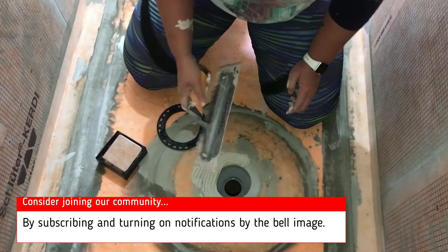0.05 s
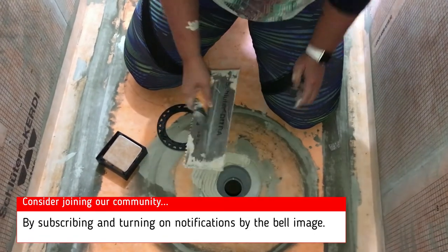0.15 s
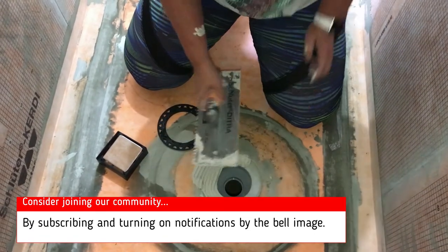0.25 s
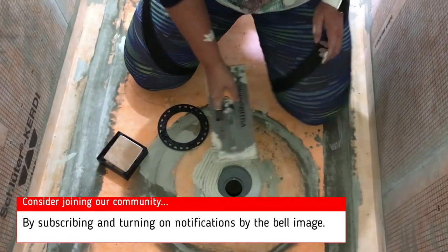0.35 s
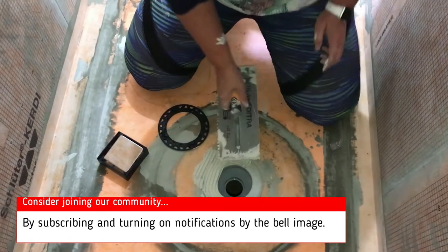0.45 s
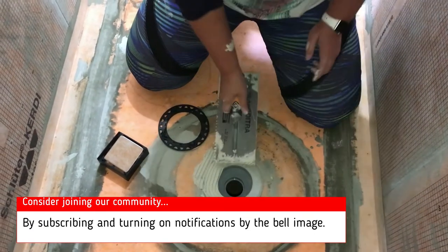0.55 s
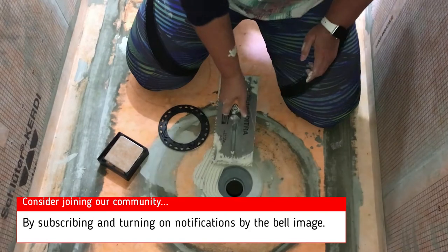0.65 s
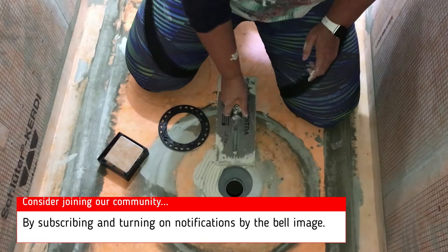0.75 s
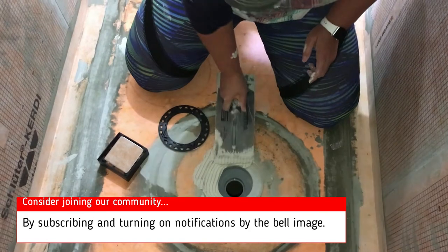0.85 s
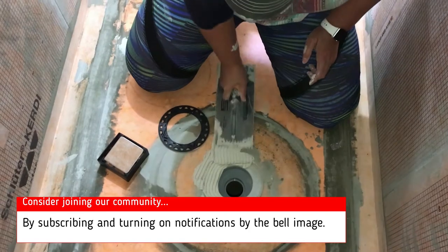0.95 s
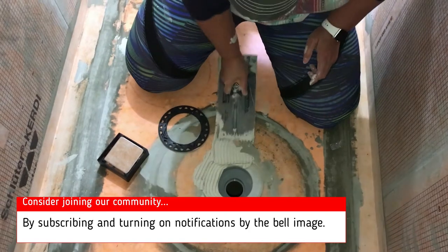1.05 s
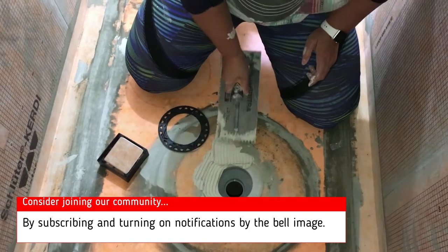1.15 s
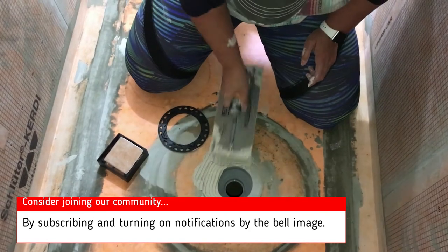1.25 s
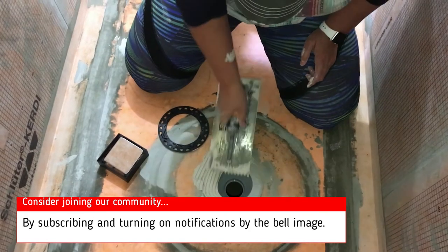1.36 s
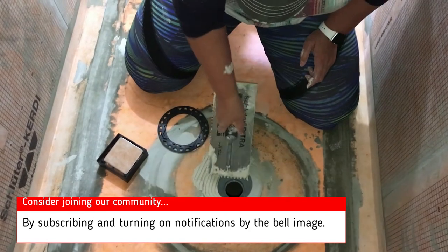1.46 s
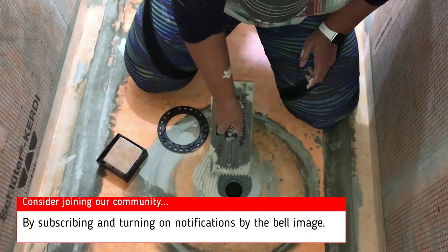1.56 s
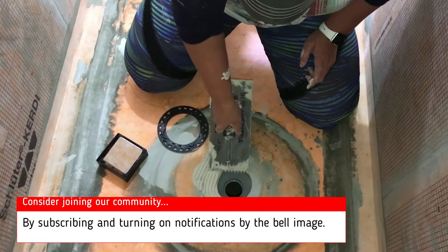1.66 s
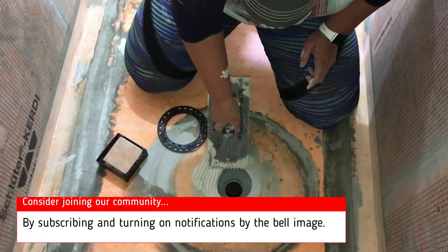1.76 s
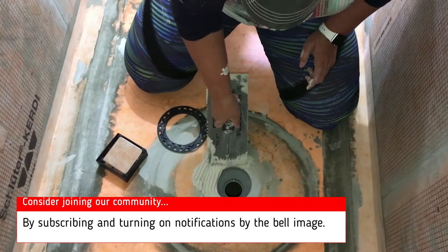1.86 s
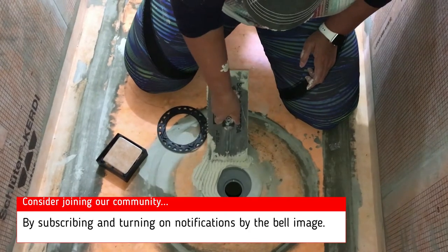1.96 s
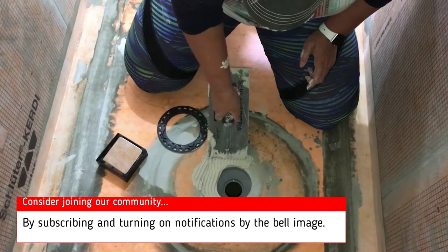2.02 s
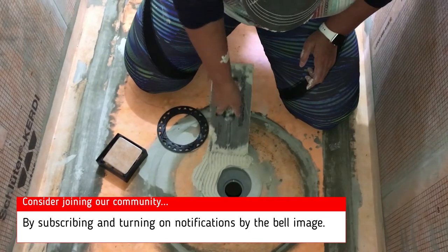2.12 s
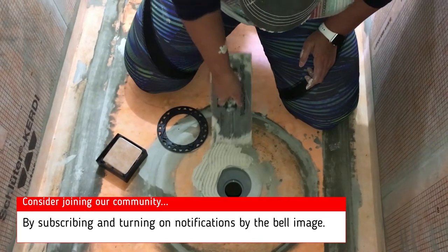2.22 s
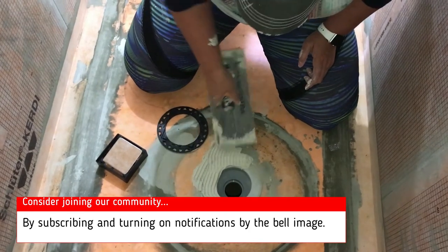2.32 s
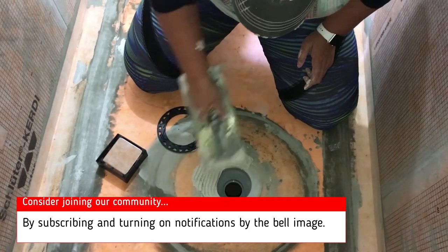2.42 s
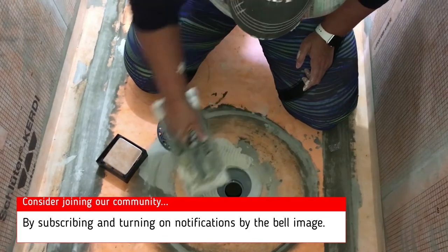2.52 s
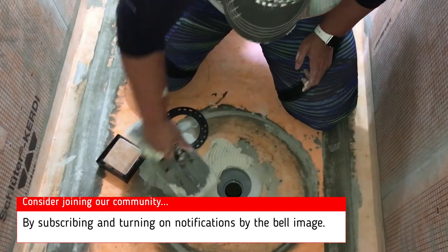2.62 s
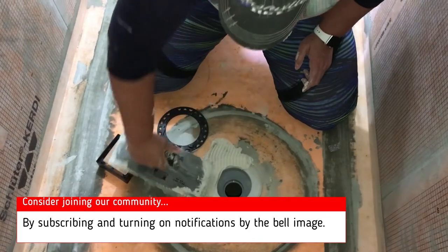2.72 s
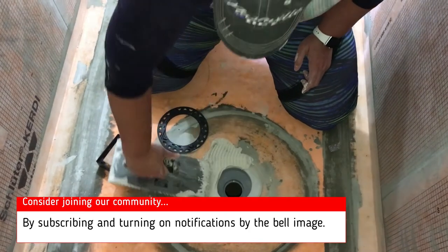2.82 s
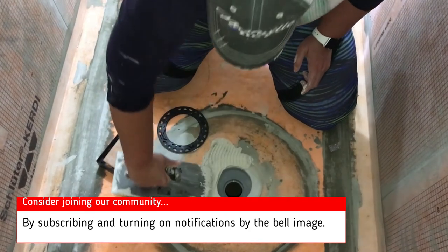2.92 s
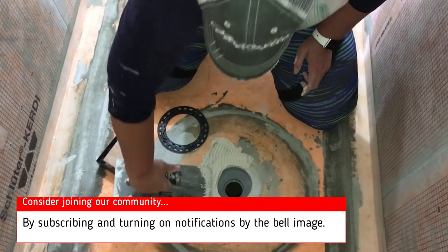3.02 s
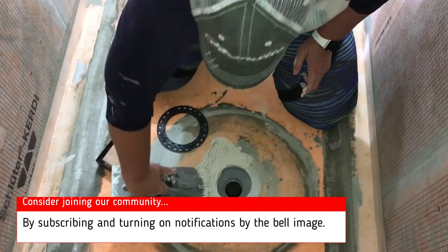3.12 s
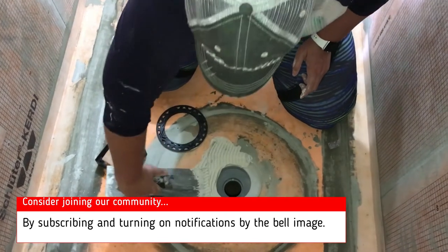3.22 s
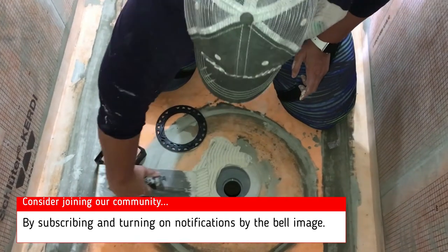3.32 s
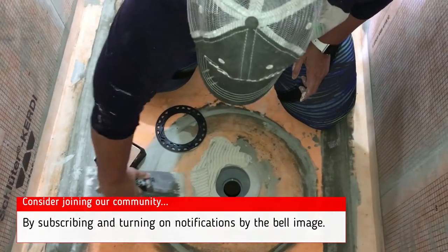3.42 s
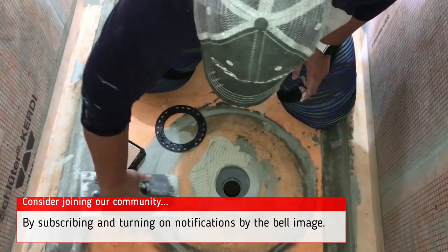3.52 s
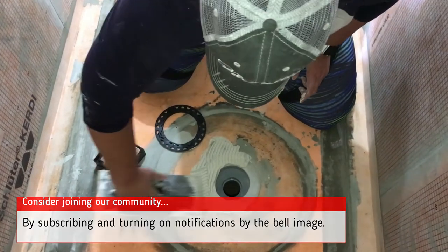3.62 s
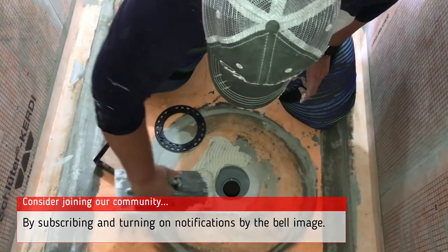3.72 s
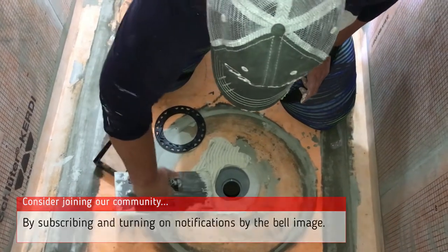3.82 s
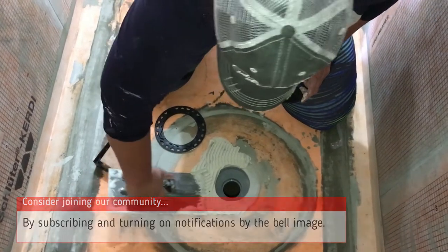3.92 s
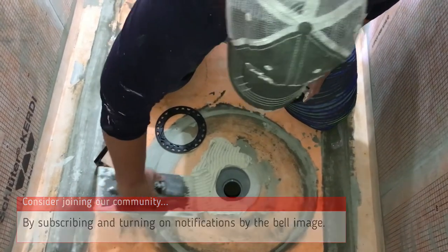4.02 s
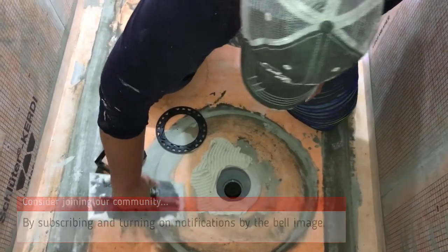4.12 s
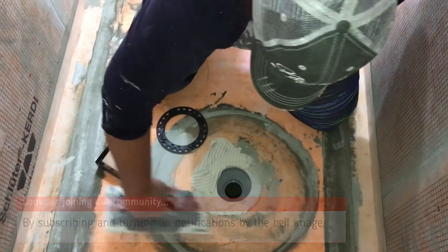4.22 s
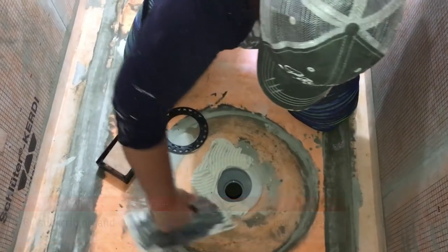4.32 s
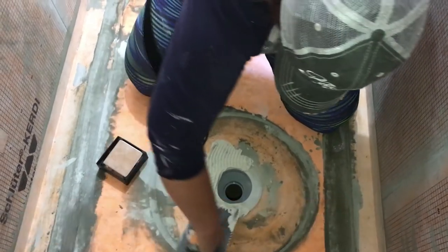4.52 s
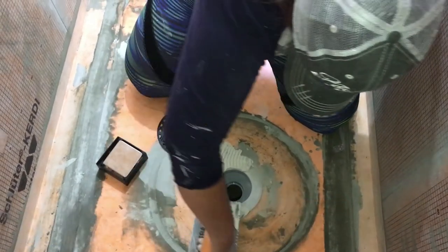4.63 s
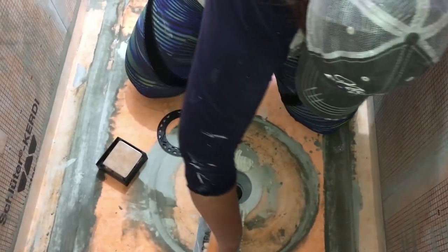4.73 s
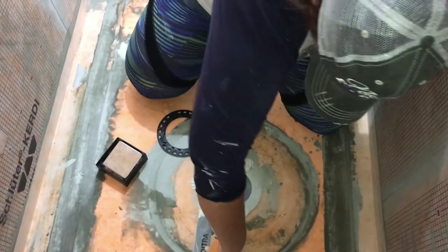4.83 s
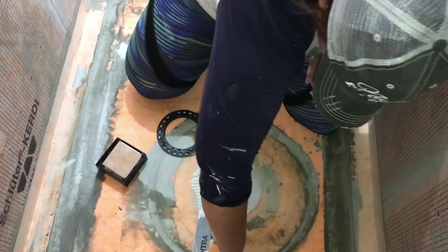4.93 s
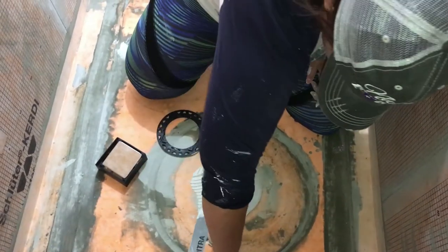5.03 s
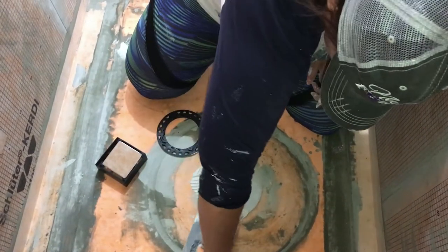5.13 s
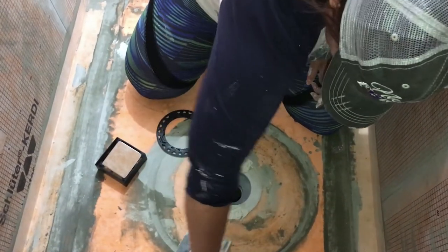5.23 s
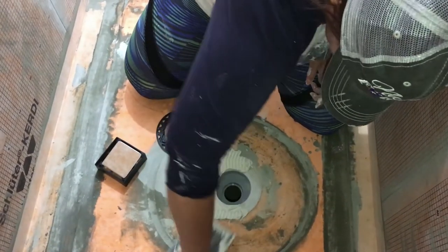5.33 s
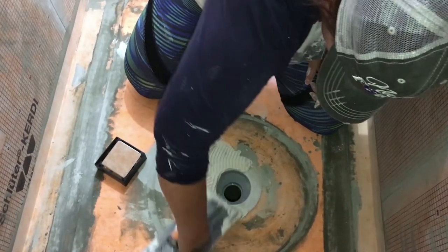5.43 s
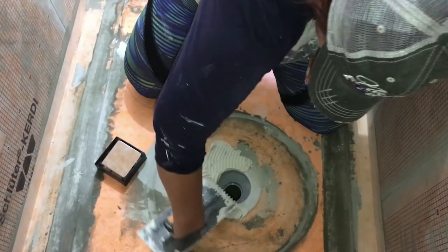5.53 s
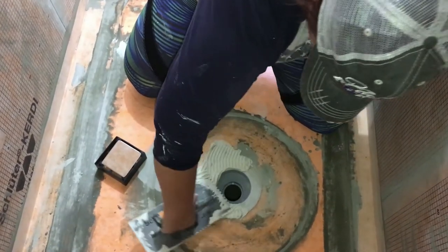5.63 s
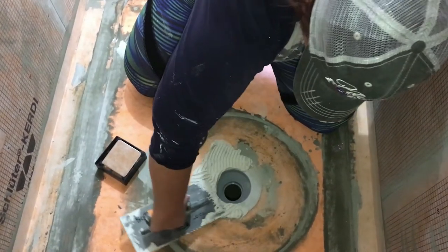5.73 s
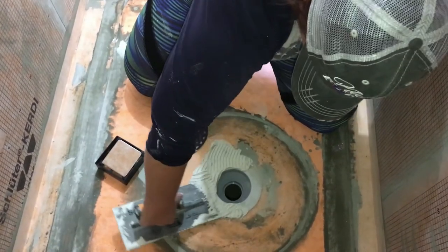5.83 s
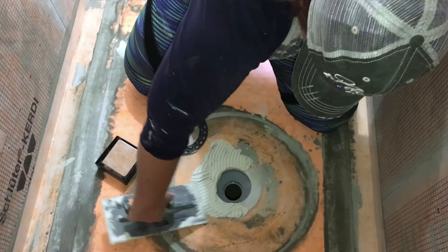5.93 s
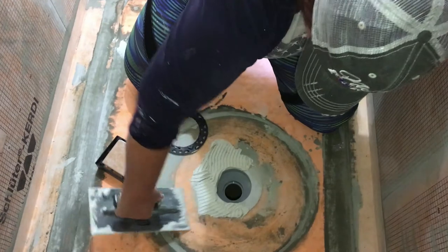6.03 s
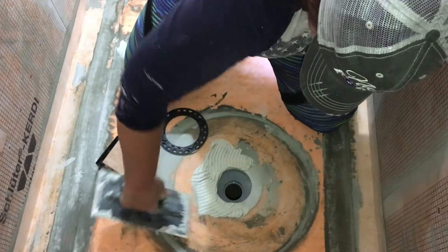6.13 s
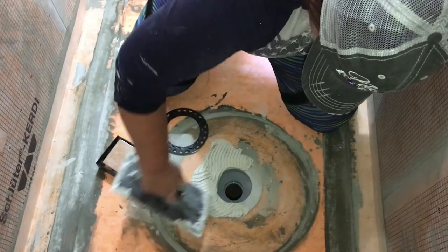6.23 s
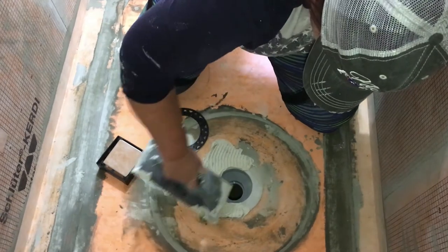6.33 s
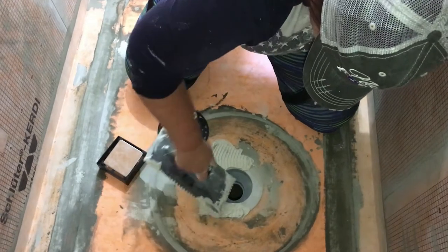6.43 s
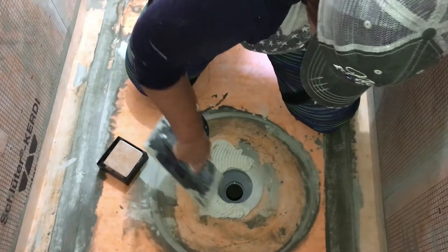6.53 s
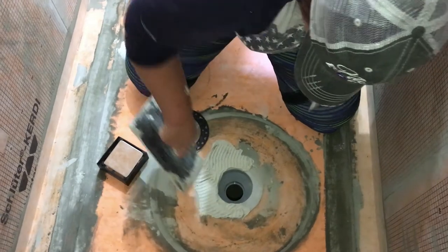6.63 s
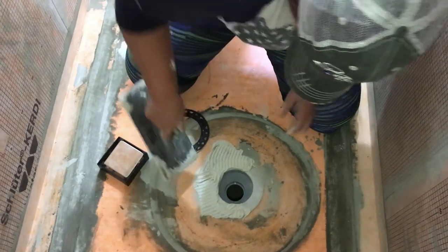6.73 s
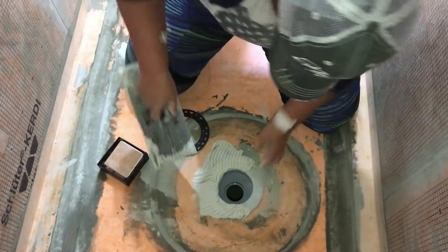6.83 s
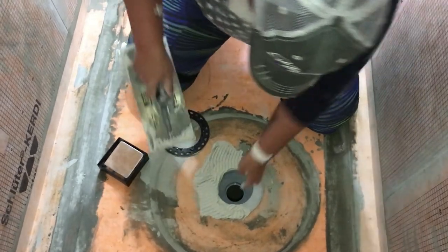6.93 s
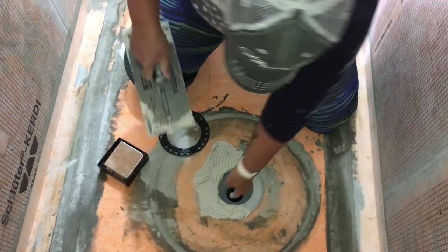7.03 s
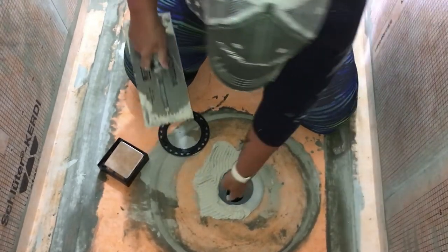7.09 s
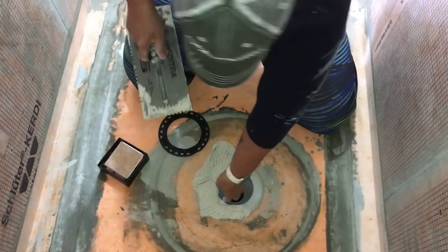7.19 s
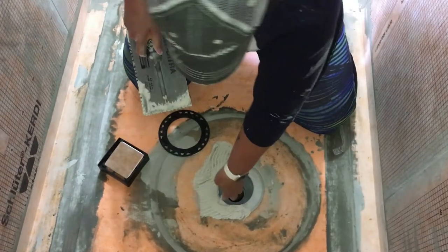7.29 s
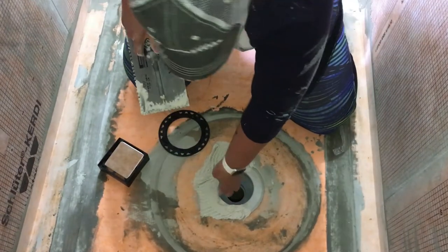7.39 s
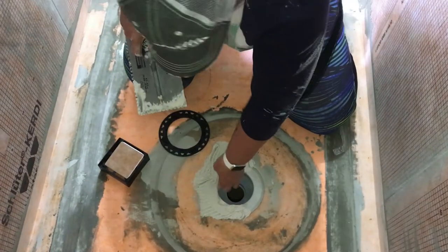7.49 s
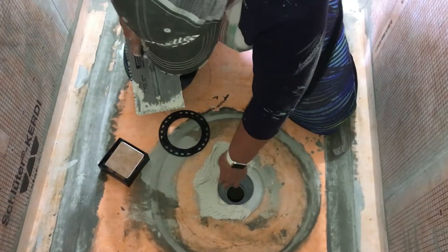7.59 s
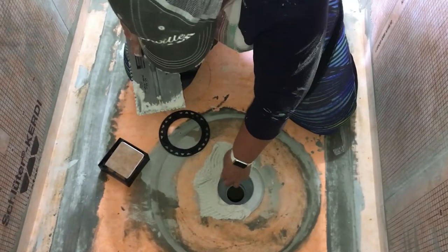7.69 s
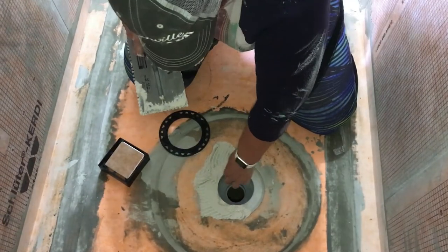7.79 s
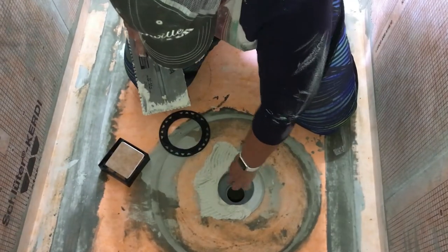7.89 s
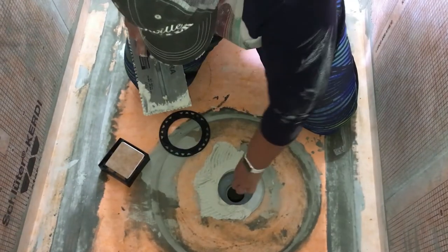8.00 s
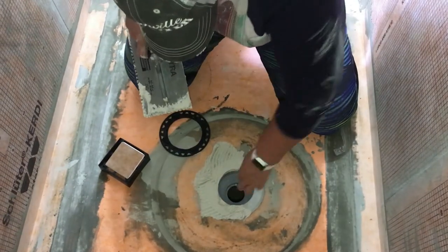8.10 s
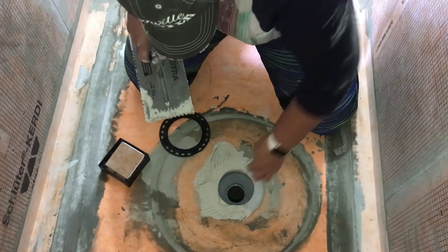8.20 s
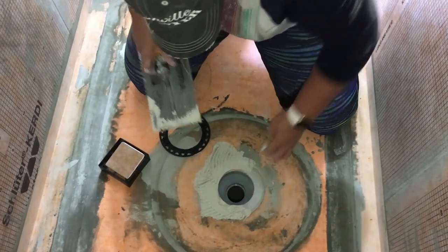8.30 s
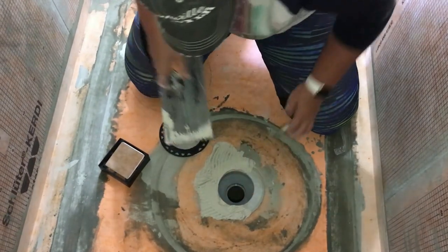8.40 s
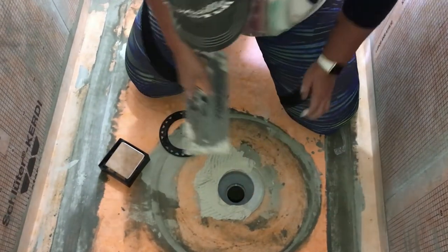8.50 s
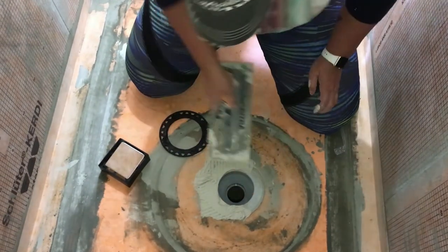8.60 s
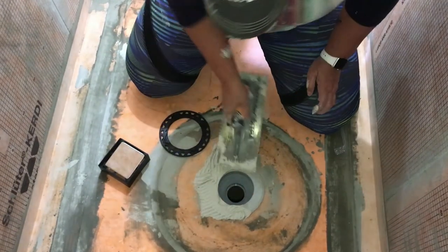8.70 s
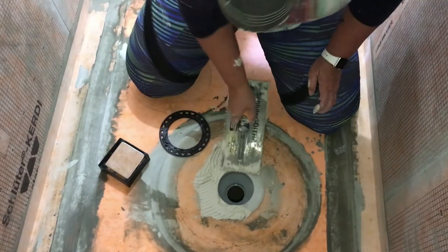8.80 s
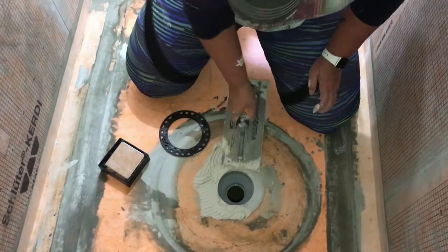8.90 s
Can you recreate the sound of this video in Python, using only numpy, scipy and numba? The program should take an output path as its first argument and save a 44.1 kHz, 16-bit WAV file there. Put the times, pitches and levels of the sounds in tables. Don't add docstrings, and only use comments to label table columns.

```python
import sys
import numpy as np
from scipy import signal
from scipy.io import wavfile
from scipy.ndimage import uniform_filter1d
from numba import njit

SR = 44100
rng = np.random.default_rng(int(sys.argv[2]) if len(sys.argv) > 2 else 0)


def voltage_ratio(decibels):
    exponent = np.asarray(decibels, float) / 20
    return 10 ** exponent


def pcm_store(signal):
    levels = np.round(np.clip(np.atleast_2d(signal), -1, 1) * 32767)
    wavfile.write(sys.argv[1], SR, levels.astype(np.int16).T)


N = 394694

# (f/Hz, width/Hz, level/dB)
BLADE = [(952, 120, -6.5), (1270, 153, 2.5), (1470, 152, -3.5), (1820, 193, 2.5), (2073, 220, -4),
         (2507, 270, -2), (2860, 210, -4), (3184, 300, -3), (4077, 350, -10)]
# (f/Hz, width/Hz, level/dB)
GRIT = [(4090, 2400, -3), (6210, 920, 1.5), (6840, 700, 2), (9020, 2000, -1.5), (11290, 1300, 0),
        (13100, 1600, 0.5), (15500, 2300, -2)]


def level(x, db):
    return x * voltage_ratio(db) / np.sqrt(np.mean(x ** 2))


@njit
def svf(x, hz, width):
    y, b, l = np.empty(len(x)), 0., 0.
    for i in range(len(x)):
        g = np.tan(np.pi * hz[i] / SR)
        k = width[i] / hz[i]
        v = (b + g * (x[i] - l)) / (1 + g * (g + k))
        b, l, y[i] = 2 * v - b, l + 2 * g * v, k * v
    return y


def band(x, hz, width):
    return svf(x, hz + np.zeros(len(x)), width + np.zeros(len(x)))


def body(x, modes):
    return sum((-1) ** k * voltage_ratio(db) * band(x, hz, width) for k, (hz, width, db) in enumerate(modes))


def walk(rate):
    k = int(SR / rate)
    held = np.repeat(rng.standard_normal(N // k + 1), k)
    return 1.2 * uniform_filter1d(uniform_filter1d(held, k), k)[:N]


def press(start, full, lift, rise_db, fall_db_s, bend=1.):
    t = np.arange(N * 1000 // SR + 2) / 1000
    short = np.clip((full - t) / (full - start), 0, 1)
    return np.where(t < start, -120, -rise_db * short ** bend - fall_db_s * np.maximum(t - lift, 0))


def spread(control):
    return np.interp(np.arange(N) * 1000 / SR, np.arange(len(control)), control)


def lead(gains, values):
    weight = np.power(gains, 3) + 1e-30
    values = np.reshape(values, (len(gains), -1))
    return spread(np.sum(weight * values, axis=0) / np.sum(weight, axis=0))


def floor():
    # (f/Hz, level/dB per Hz)
    room_tone = [(15, -34), (25, 17), (59, -7), (229, -23), (344, -7.5), (775, -38.5), (988, -16),
                 (2760, -25), (2990, -29.5), (4740, -25), (5880, -27), (12900, -28), (16000, -45)]
    out, (hz_points, db_points) = 0, np.transpose(room_tone)
    for hz in 30 * 2 ** np.arange(0, 9.2, .5):
        db = np.interp(np.log(hz), np.log(hz_points), db_points) + 1.3 * walk(4.5)
        out = out + voltage_ratio(db) * band(rng.standard_normal(N), hz, hz / 1.8)
    return level(out, -64)


def drain():
    # (t/s, length/s, level/dB, pipe f/Hz, upper mode level/dB)
    rim_rubs = [
        (0.102, 0.13, -66, 1316, -8),
        (4.52, 0.076, -67, 1230, -5.5),
        (7.355, .07, -74, 1000, 10),
        (7.59, 0.067, -61.5, 995, -8),
        (7.691, 0.085, -61.5, 1030, -9),
        (7.808, 0.041, -61, 1380, -8),
        (7.897, 0.034, -58.5, 1443, 1),
        (8.07, 0.22, -70.5, 1420, -29.5),
        (8.417, 0.097, -64.5, 1320, -1.5),
    ]
    rise_s, fall_db_s = 0.036, 250
    efforts = [db + press(s - rise_s, s, s + length, 17, fall_db_s) for s, length, db, _, _ in rim_rubs]
    rubs = voltage_ratio(efforts)
    pipe_hz, upper_db = (lead(rubs, np.array(rim_rubs)[:, k]) for k in (3, 4))
    pipe_hz = pipe_hz * (1 + .015 * walk(12))
    rub = rng.standard_normal(N) * voltage_ratio(3 * walk(30))
    low = level(band(band(rub, pipe_hz, 260), pipe_hz, 95), 0)
    upper = level(body(rub, [(3020, 660, -0.19), (3960, 570, -0.79)]), 0)
    return spread(np.sum(rubs, axis=0)) * voltage_ratio(-3.5) * (low + voltage_ratio(upper_db) * upper)


def hand():
    # (bite t/s, full pressure t/s, lift t/s, blade level/dB, grit hiss level/dB rel.)
    strokes = [
        (0.317, 0.478, 0.51, -41.5, 4),
        (0.882, 1.009, 1.058, -24.5, -1),
        (2.142, 2.205, 2.259, -27.5, -2),
        (3.185, 3.321, 3.503, -30, -4.5),
        (3.893, 4.017, 4.117, -26.5, -5),
        (5.12, 5.184, 5.257, -27, -6.5),
        (5.906, 5.97, 6.066, -27, -6),
    ]
    # (tray level/dB rel., slab level/dB rel., tray f/Hz, wedge f/Hz at bite, upper modes level/dB)
    grips = [(-6, -9.5, 340, 830, 6.5), (-12, -24, 517, 2000, 4.5), (-6.5, -8.5, 500, 1630, 4),
             (-5.5, -6, 700, 1770, 4), (-8, -9.5, 570, 1550, 3), (-7, -12.5, 605, 1250, 0.5),
             (-5.5, -12, 620, 1350, 1)]
    # (t/s, length/s, blade level/dB, grit hiss level/dB rel., tray level/dB rel.)
    drags = [(0.86, 0.088, -51.5, -9, 2), (3.215, 0.075, -44.5, -1, -11.5),
             (1.736, 0.13, -49.5, -15, -12.5), (1.855, 0.06, -47, -13, -5.5),
             (1.935, 0.35, -45.5, -1.5, -2.5), (3.067, 0.031, -51, -4, -8.5),
             (3.835, 0.021, -50, -10.5, -4.5), (4.834, 0.029, -51.5, -2, -8.5),
             (5.064, 0.16, -43.5, -3, -11.5), (5.634, 0.13, -42.5, -12, -4.5), (5.803, .012, -34, -6.5, -9),
             (5.845, .07, -37.5, -2, -7.5), (2.07, 0.042, -47, 5, -1), (1.82, 0.022, -47, -2, -4),
             (8.866, .09, -57.5, -3, 7)]
    # (t/s, length/s, blade level/dB, grit hiss level/dB
    # rel., tray level/dB rel.)
    rustles = [(0.317, 0.0199, -57.5, 6.5, -19), (.36, 0.14, -48, 2.5, 2.5), (6.642, 0.041, -60, 4, 0.5),
               (7.853, 0.042, -58.5, -3, -18), (7.916, 0.014, -58, -3, 0.5), (0.139, 0.48, -68.5, 8, -10),
               (0.51, 0.12, -62, 7, -5), (0.753, 0.124, -70, -2, 4.5), (2.619, .07, -72.5, -1, 2.5),
               (2.828, .1, -75, 9.5, -2), (2.952, 0.091, -68.5, 9.5, -2), (3.582, 0.1605, -72, -1, 7),
               (4.244, 0.089, -67.5, -2.5, 8.5), (4.5, 0.29, -76, 12.5, -11), (4.896, 0.14, -66, 5, 0.5),
               (6.156, 0.14, -61.5, -0.5, -4), (6.333, 0.2, -73, -14, 8), (6.795, 0.39, -73, 2.5, 1.5),
               (7.188, 0.78, -67, 2, -3), (8.438, 0.16, -70, 6.5, 0.5), (8.898, .04, -57.5, -10, 13),
               (5.56, 0.067, -77.5, -14, 7)]
    fall_db_s = (229, 335, 220, 210)
    flatten_db_s = (7.5, -29, 76, 45)
    lag_s = (-0.0039, -0.0063, 0.016, 0.0017)
    t = np.arange(N * 1000 // SR + 2) / 1000
    gains, holds = [], []
    for (start, full, lift, db, grit_db), grip in zip(strokes, grips):
        tray_db, slab_db, tray_hz, wedge_hz, edge_db = grip
        parts = []
        for rel, grow, fall, lag in zip((0, grit_db - 2.5, tray_db, slab_db), flatten_db_s, fall_db_s, lag_s):
            flatten = grow * np.clip(t - lift, start - lift, 0)
            effort = press(start, full, lift + lag, 28, fall, 1.24)
            parts.append(voltage_ratio(db + rel + flatten + effort))
        gains.append(parts)
        flat = np.clip((t - start) / (lift - start), 0, 1.4)
        wedge = wedge_hz * (1 - 0.4 * flat ** 1.5)
        sag = np.maximum(1 - 1.4 * np.maximum(t - lift, 0), .4)
        edge = edge_db - 5 * np.minimum(flat, 1) ** 3 - 76 * np.clip(t - lift, 0, .3)
        holds.append((wedge, tray_hz * sag, edge, 1))
    hop_db = 1.5 * np.interp(t * SR, np.arange(N), walk(90))
    for s, length, db, grit_db, tray_db in drags:
        touch = db + hop_db + press(s, s + 0.0037, s + length, 13, 380.5)
        gains.append([voltage_ratio(touch + rel) for rel in (0, grit_db, tray_db, -52.5 - db)])
        holds.append((1190, 576, 2, 2))
    for s, length, db, grit_db, tray_db in rustles:
        brush = db + press(s - .04, s, s + length, 29, 174.5)
        gains.append([voltage_ratio(brush + rel) for rel in (0, grit_db, tray_db, -70 - db)])
        holds.append((1120, 343, 2.5, -2))
    gains = np.array(gains)
    held = [lead(gains[:, 0], [h[k] + 0 * t for h in holds]) for k in range(4)]
    return [spread(g) for g in np.sqrt(np.sum(gains ** 2, axis=0))], held


def sand(per_s, spread_db, slip_db):
    hit = rng.random(N) < per_s / SR
    size = rng.exponential(size=N)
    sign = rng.standard_normal(N)
    slip = voltage_ratio(slip_db * (walk(60) + 1.2 * walk(220)))
    return level(hit * voltage_ratio(spread_db * np.minimum(size, 5)) * sign * slip, 0)


def stroke():
    # (f/Hz, width/Hz, level/dB)
    foam_tray = [(194, 56, -6.5), (295, 34, -1.5), (368, 45, -2.5), (453, 28, -0.5), (573, 27, 1.5),
                 (624, 44, -3), (667, 33, 1), (796, 80, -8)]
    # (f/Hz, width/Hz, level/dB)
    slab_modes = [(54.5, 35, -8.5), (82, 16, -1), (158.9, 15, -0.5)]
    (blade, grit, hollow, slab), (wedge_hz, tray_hz, edge_db, fizz_db) = hand()
    grains = sand(per_s=7000, spread_db=1.7, slip_db=1.5)
    wedge = band(band(grains, wedge_hz, 1.1 * wedge_hz), wedge_hz, 2.0 * wedge_hz)
    steel = body(grains, BLADE[:4]) + voltage_ratio(edge_db + 3.0) * body(grains, BLADE[4:])
    ring = level(level(steel, 0) + level(body(wedge, BLADE), -1.9) + level(wedge, -4), 0)
    fine = grains + 0.65 * rng.standard_normal(N)
    hiss = body(fine, GRIT[:5]) - voltage_ratio(fizz_db) * body(fine, GRIT[5:])
    tray = body(grains + 1.2 * rng.standard_normal(N), foam_tray)
    boom = level(level(tray, -0.5) + level(band(tray, tray_hz, 0.32 * tray_hz), 0), 0)
    weight = rng.standard_normal(N)
    mix = blade * ring + grit * level(hiss, 0) + hollow * boom
    mix += slab * level(body(weight, slab_modes), 0)
    return voltage_ratio(-3.0) * mix


def catches():
    # (t/s, peak level/dB, treble level/dB rel., thud level/dB rel.,
    # colour f/Hz)
    landings = [(0.524, -47.5, -19, 14, 1900), (1.738, -30.5, -18, -15, 1210), (2.664, -54, -5, 3, 1410),
                (3.071, -42.5, 5, -1, 930), (3.838, -37.5, -16, 8.5, 1260), (4.837, -35, 7.5, -11, 1376),
                (5.066, -30.5, -14, -21, 1136), (5.638, -33, -26.5, -5, 2456), (3.49, -49, -20, 12, 900),
                (5.263, -44, -20, 10.5, 870), (6.04, -48.5, -18, 21, 897.6), (8.87, -40, -10, 9.5, 1204)]
    # (t/s, peak level/dB, treble level/dB rel., colour f/Hz)
    tooth_catches = [(0.949, -30, -4, 1440), (1.778, -37.5, -17.5, 1210), (1.838, -31.5, -15.5, 1980),
                     (1.857, -30.5, -15, 1900), (1.877, -22.5, -26, 1840), (1.934, -31.5, -1, 1790),
                     (2.057, -30.5, -4, 1684), (3.327, -21, -17, 1820), (3.412, -17, -8, 1270),
                     (5.086, -30, -1, 1037), (5.135, -28.5, 8.5, 1180), (5.676, -26, -19.5, 1107),
                     (5.697, -24.5, -22, 2460), (5.754, -26.5, 6, 1204), (5.807, -29, -0.5, 1155),
                     (5.848, -12, -16.5, 2360), (5.850, -17.5, -20.5, 1315), (2.036, -37, -8, 1500),
                     (5.944, -23.5, -29, 1173), (2.081, -43, -5, 1500), (5.651, -31, -30, 2400),
                     (5.719, -29.5, -24, 2397), (6.109, -38, 14, 1200), (7.94, -39.5, 2, 1400)]
    # (f/Hz, width/Hz, level/dB)
    knock = [(54.9, 10, 5.5), (170, 37, -9), (355, 280, -10), (590, 90, -14)]
    landing_t60_s, catch_t60_s, catch_thud_db = 0.086, 0.099, -25.5
    steel, hiss, push = np.zeros((3, N + SR // 4))
    t = np.arange(SR // 4) / SR
    blows = [(s, db, top, thud, landing_t60_s, hz) for s, db, top, thud, hz in landings]
    blows += [(s, db, top, catch_thud_db, catch_t60_s, hz) for s, db, top, hz in tooth_catches]
    for s, peak_db, treble_db, thud_db, t60, hz in blows:
        i = int(s * SR)
        crack = 0.41 * np.exp(-t / .0016) + 0.4 * 1000 ** (-t / t60)
        grit = rng.standard_normal(len(t))
        rattle = voltage_ratio(peak_db) * crack * grit / np.sqrt(np.sum((crack * grit) ** 2) / np.sum(crack ** 2))
        steel[i:i + len(t)] += voltage_ratio(8.0) * band(rattle, hz, 0.23 * hz) + voltage_ratio(-4.0) * band(rattle, 2800, 3600)
        hiss[i:i + len(t)] += voltage_ratio(treble_db) * rattle
        push[i:i + len(t)] += voltage_ratio(peak_db + thud_db) * t / 0.00088 * np.exp(-t / 0.00078)
    thud = voltage_ratio(18.5) * body(push, knock)
    return (voltage_ratio(-4.0) * body(steel, BLADE) + voltage_ratio(1.0) * steel + voltage_ratio(-4) * body(hiss, GRIT) + thud)[:N]


@njit
def walls(x, lags, gain, damp):
    line, soft, out = np.zeros((8, 4096)), np.zeros(8), np.zeros(len(x))
    for i in range(len(x)):
        total = 0.
        for k in range(8):
            soft[k] += (1 - damp) * (gain[k] * line[k, (i - lags[k]) & 4095] - soft[k])
            total += soft[k]
            out[i] += soft[k] * (1 - 2 * (k % 2))
        for k in range(8):
            line[k, i & 4095] = x[i] + soft[k] - total / 4
    return out


def scene():
    near = stroke() + catches() + drain()
    t60_s, damp, stall_db = 0.43, 0.35, -15
    lags = rng.integers(300, 1500, size=8)
    stall = walls(near + 1e-18, lags, voltage_ratio(-60 * lags / SR / t60_s), damp)
    return (near + voltage_ratio(stall_db) * stall + floor())[None]


def band_limit(x):
    return signal.sosfilt(signal.butter(12, 16980, fs=SR, output="sos"), x)


def record(dry):
    cut = signal.sosfilt(signal.butter(3, 48, "high", fs=SR, output="sos"), dry)
    cut = signal.sosfilt(signal.ellip(10, .3, 45, 15800, fs=SR, output="sos"), cut)
    voiced = cut[0] - 0.37 * band(cut[0], 10450, 630)
    return band_limit(voiced)


dry = scene()
out = record(dry)
pcm_store(out)
```